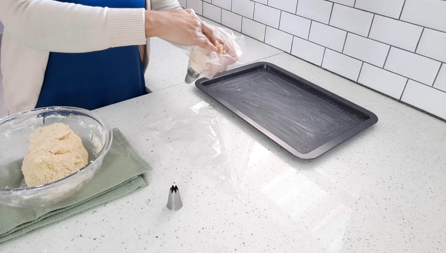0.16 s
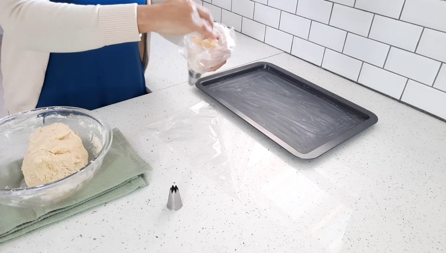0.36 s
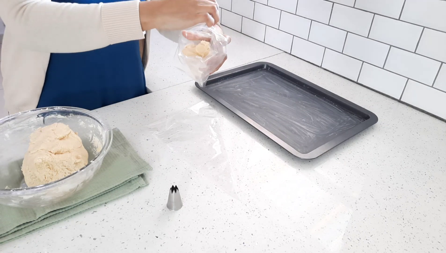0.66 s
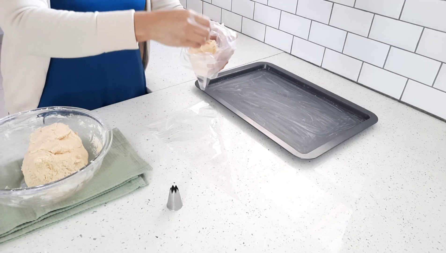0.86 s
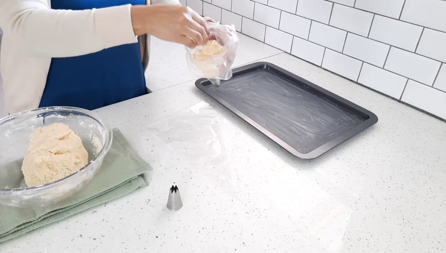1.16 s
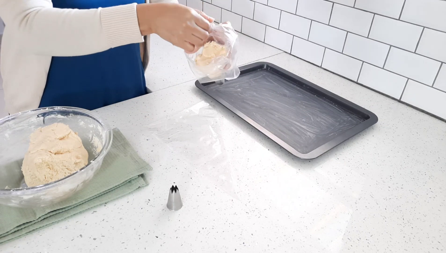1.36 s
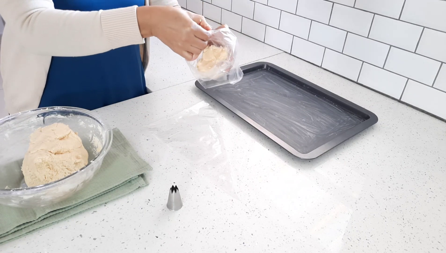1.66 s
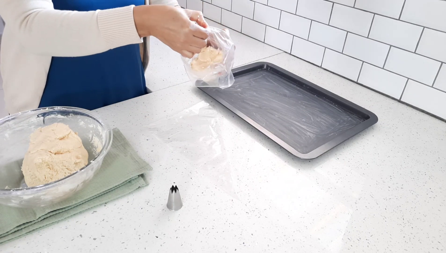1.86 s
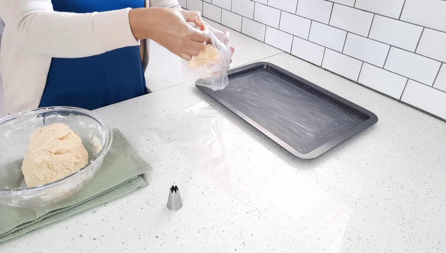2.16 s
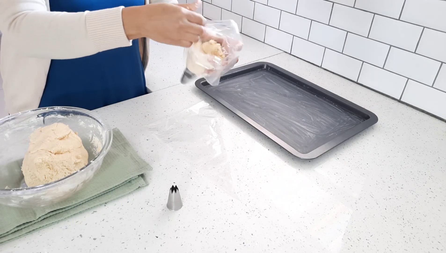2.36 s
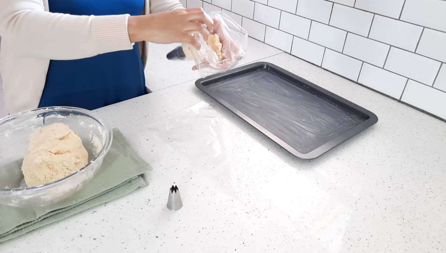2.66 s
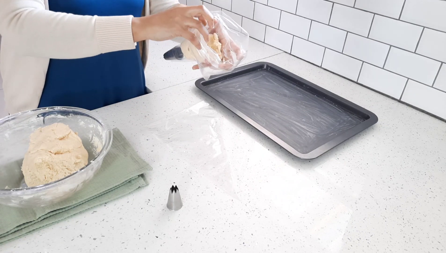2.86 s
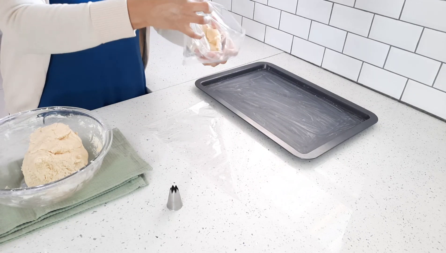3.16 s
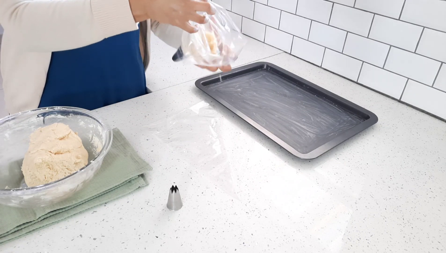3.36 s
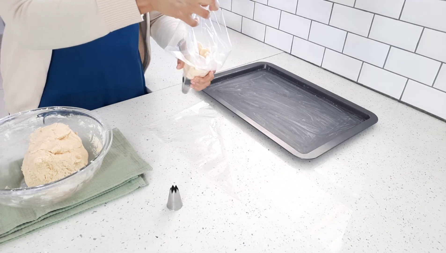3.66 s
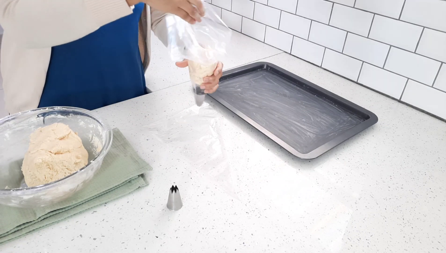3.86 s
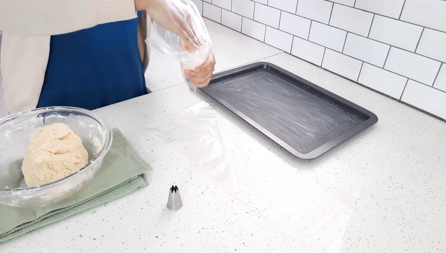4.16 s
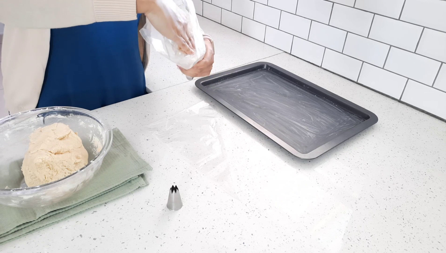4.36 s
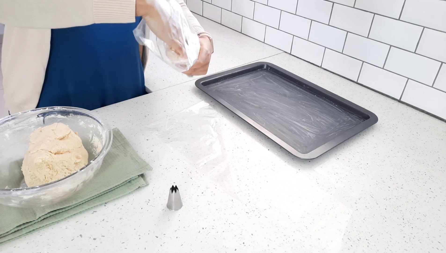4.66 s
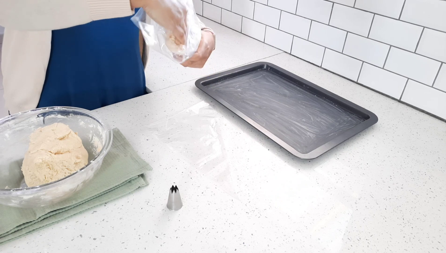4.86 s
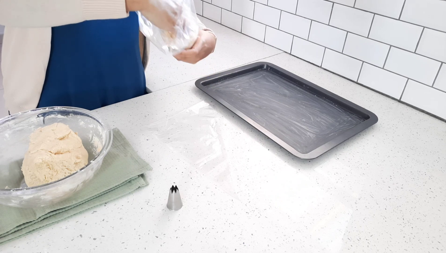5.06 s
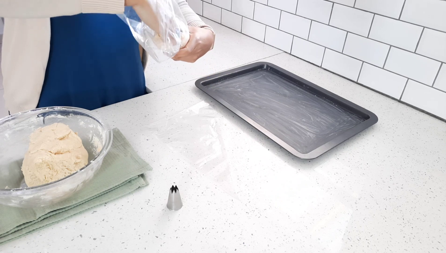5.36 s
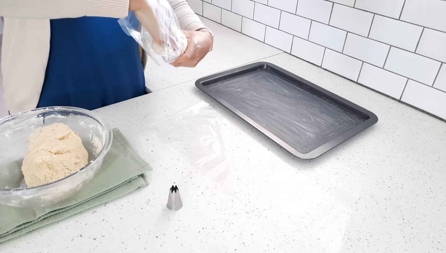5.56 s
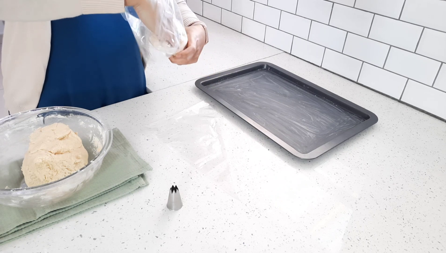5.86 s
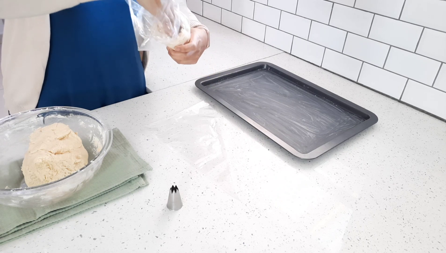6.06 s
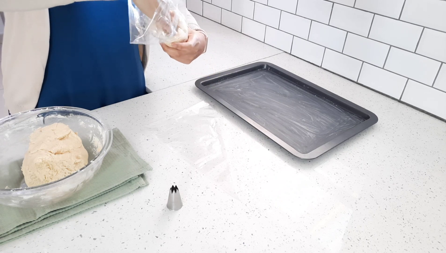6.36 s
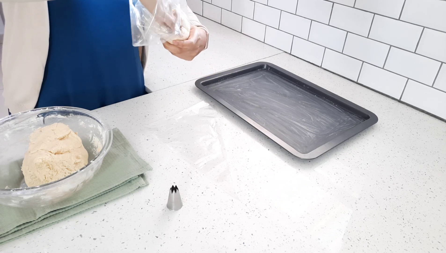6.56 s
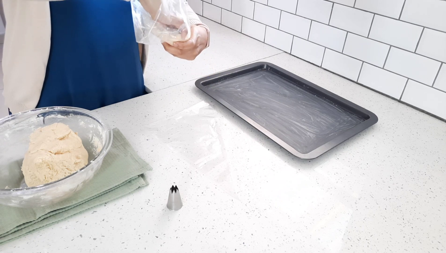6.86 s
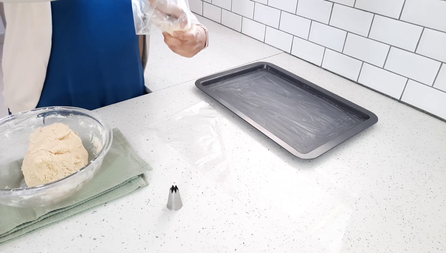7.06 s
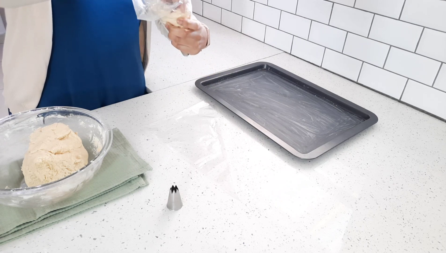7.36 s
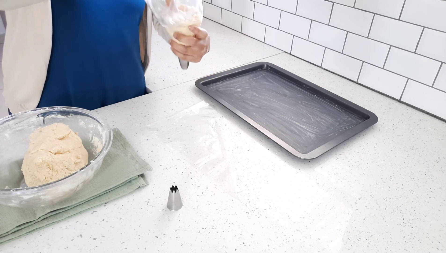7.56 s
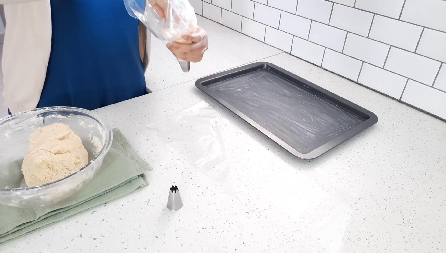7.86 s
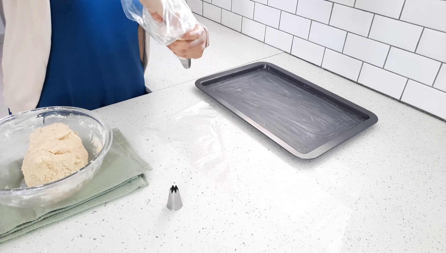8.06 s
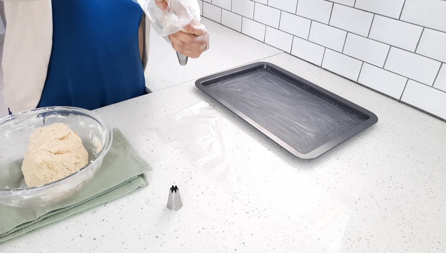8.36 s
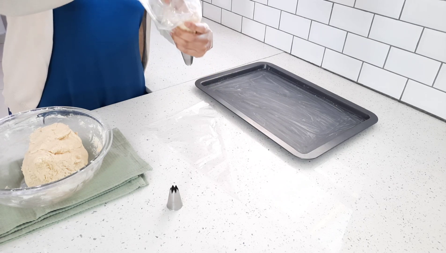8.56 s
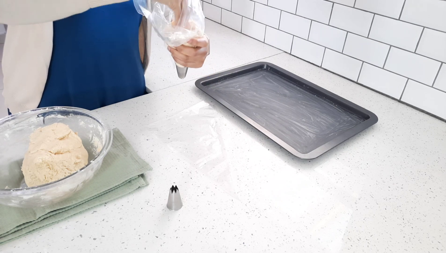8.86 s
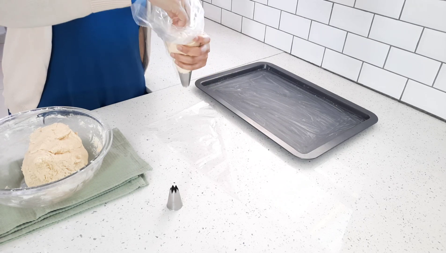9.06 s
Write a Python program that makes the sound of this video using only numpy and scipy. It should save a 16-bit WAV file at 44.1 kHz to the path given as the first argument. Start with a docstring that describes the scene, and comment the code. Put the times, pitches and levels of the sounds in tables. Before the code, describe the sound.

Plastic film is handled near two microphones, slightly stronger on the left. It begins sparse and quiet, with a small nozzle tick and a short sliding hiss, then swells into sharp crinkling and flapping with muffled dough knocks. Separate twisting and squeezing bursts follow, with brief lulls between, each leaving a short bright room reflection above a faint appliance hum.

```python
"""A plastic piping bag full of soft dough, heard by a close pair of microphones over a faint room hum.
It is lifted and turned, its metal nozzle ticks once and a finger hisses along the taut film.
The loose top is gathered, the dough pushed down, the neck twisted shut, the dough squeezed to the nozzle.
Film snaps, creases and pops as random flutter through resonant facets and short decaying sines, while
slack panels flap and dough thumps dully; a tiled kitchen rings after each sound."""
import sys
import numpy as np
from scipy import signal
from scipy.fft import rfft, irfft
from scipy.io import wavfile
from scipy.ndimage import uniform_filter1d

SR = 44100
rng = np.random.default_rng(int(sys.argv[2]) if len(sys.argv) > 2 else 0)


def file_out(sig):
    """Save sig as 16-bit WAV at sys.argv[1]."""
    # one column per channel
    cols = np.atleast_2d(sig).T
    # limit, then scale
    lim = np.clip(cols, -1, 1)
    pcm = np.round(lim * 32767).astype(np.int16)
    wavfile.write(sys.argv[1], SR, pcm)


N = 406161  # length in samples

# Colour of the buckling film. Each row: frequency in Hz, relative level in dB.
FILM_COLOUR = [(180, -18.5), (540, -2.5), (820, 5.5), (1200, 6), (1700, 5.5), (2500, 4.5), (3500, 1),
               (5500, 0), (7900, 0), (8900, -6), (11000, -9.5), (11900, -30)]
# Small, taut creases sound higher than broad, soft folds.
# Each row: frequency in Hz, share of the brightness (dB of colour per dB of brightness).
BRIGHTNESS_TILT = [(900, -0.537), (1500, -0.494), (2600, -0.062), (4500, 0.429), (10000, 0.658)]


def amp(db):
    """Decibels to gain."""
    return 10 ** (np.asarray(db) / 20)


def unit(x):
    """Scales to rms 1."""
    return x / np.sqrt(np.mean(x ** 2) + 1e-20)


def read(points, hz):
    """Reads a table on a log-frequency axis."""
    f, value = np.transpose(points)
    return np.interp(np.log(hz + 1), np.log(f), value)


def add(mix, s, sound):
    """Lays a sound into the mix at time s in seconds."""
    part = mix[max(round(s * SR), 0):][:len(sound)]
    part += sound[:len(part)]


def pop(colour, decay_s, uneven_db, bright_db=0, size=1024):
    """One buckle, energy 1: a jolt and a brief flutter through a facet with its own random resonances."""
    t, hz = np.arange(size) / SR, np.fft.rfftfreq(size, 1 / SR)
    jolt = np.searchsorted(t, .0005)  # the fold strains for an instant before it lets go
    envelope = np.minimum(t / t[jolt], np.exp((t[jolt] - t) / decay_s))
    flutter = rng.standard_normal(size) * envelope
    flutter[jolt] += 3.6
    flutter = rfft(flutter)

    knots = np.geomspace(100, 14000, 28)  # Hz, where the random resonances are drawn
    facet_db = read(colour, hz) + bright_db * read(BRIGHTNESS_TILT, hz)
    facet_db += uneven_db * np.interp(hz, knots, rng.standard_normal(len(knots)))

    spread = np.sqrt(uniform_filter1d(abs(flutter) ** 2, size=15))  # the flutter feeds all bands evenly
    cepstrum = irfft(np.log(amp(facet_db) / spread))
    cepstrum[1:size // 2] *= 2  # minimum phase: nothing rings before the fold moves
    cepstrum[size // 2 + 1:] = 0
    wave = irfft(np.exp(rfft(cepstrum)) * flutter)
    return wave / np.linalg.norm(wave)


def ring(hz, cycles, size=4096):
    """A stretch of film swings, falling to 1/e in the given cycles, energy 1."""
    turns = hz * np.arange(size) / SR
    wave = np.sin(2 * np.pi * turns) * np.exp(-turns / cycles)
    wave *= 1 - np.exp(-turns / 0.395)  # soft onset
    return wave / np.linalg.norm(wave)


def swarm(per_s, spread_db):
    """A train of random clicks, many small and few large, with its local power evened out."""
    chance, size = rng.random(N), rng.exponential(1, N)
    clicks = (chance < per_s / SR) * amp(spread_db * np.minimum(size, 3.6))
    power = uniform_filter1d(clicks ** 2, size=1801)
    return clicks / np.sqrt(abs(power) + 0.377 * np.mean(clicks ** 2))


def scatter(clicks, facets, choice):
    """Each click rings the facet that choice names at its moment."""
    at = np.flatnonzero(clicks)
    chosen = np.clip(choice[at], 0, len(facets) - 1)
    waves = np.array(facets)[chosen] * clicks[at, None]
    places = at[:, None] + np.arange(waves.shape[1])
    return np.bincount(places.ravel(), waves.ravel(), N)[:N]


def handling():
    """Every grip swells as it tightens and dies away on release: creasing dB, brightness dB, flapping dB."""
    # Each time the fingers take hold of the bag and press.
    # Each row: start in seconds, tightening in seconds, release to -20 dB in seconds,
    # relative creasing level in dB, brightness (treble over body) in dB, relative flapping level in dB.
    grips = [(0.309, 0.239, 0.1772, -50.5, -4, -66), (1.29, 0.135, 0.22, -68.5, 12, -74),
             (1.68, 0.029, 0.31, -58, 1.5, -64), (1.80, 0.1233, 0.76, -55, 8.5, -82),
             (1.93, 0.234, 0.2241, -42, -3.5, -48.5), (2.341, 0.0247, 0.24, -49.5, -12.5, -52),
             (2.52, 0.0634, 0.2144, -48, -6, -62), (2.671, 0.0211, 0.1, -46.5, -2.5, -50),
             (2.738, 0.0416, 0.0636, -42.5, 1, -69), (2.90, 0.0367, 0.26, -53.5, 8, -69.5),
             (3.05, 0.1312, 0.2242, -40.5, 3, -65), (3.17, 0.0243, 0.1, -40.5, 3, -45.5),
             (3.24, 0.048, 0.153, -32.5, 0, -41.5), (3.449, 0.0637, 0.0834, -44, -2.5, -51),
             (3.58, 0.038, 0.15, -48.5, -7.5, -49.5), (3.739, 0.0496, 0.1479, -34, -2.5, -40.5),
             (3.86, 0.0923, 0.2154, -40.5, -3, -50), (4.08, 0.0372, 0.6726, -45.5, -3, -56),
             (4.22, 0.1566, 0.2665, -41.5, -5, -51.5), (4.518, 0.0325, 0.107, -38.5, -3.5, -48),
             (4.60, 0.0533, 0.5319, -38.5, -5, -50), (5.031, 0.0261, 0.336, -49.5, -6, -58),
             (5.158, 0.078, 0.3458, -48.5, -4.5, -61.5), (5.37, 0.251, 0.2934, -42, -6.5, -57.5),
             (5.95, 0.0205, 0.5, -58, 1, -68), (6.049, 0.0455, 0.27, -47.5, -3, -56.5),
             (6.29, 0.1275, 0.36, -43, -4.5, -54), (6.60, 0.0976, 0.2253, -43, -7, -53),
             (6.83, 0.047, 0.1961, -40.5, -7, -56.5), (6.91, 0.0549, .11, -44, -12, -72.5),
             (7.19, 0.0265, 0.16, -51.5, 2.5, -67), (7.27, 0.0234, 0.16, -48, -10.5, -59.5),
             (7.474, 0.0551, 0.0062, -49, -3, -63.5), (7.548, 0.03154, 0.1537, -39.5, 3, -54),
             (7.60, 0.0258, 0.1832, -45.5, -8.5, -55), (7.77, 0.0637, 0.36, -47, -6.5, -54),
             (7.919, 0.0475, 0.5614, -44.5, -6, -54), (8.049, 0.181, 0.0532, -37.5, 0, -54),
             (8.35, 0.0365, 0.1415, -45.5, -13.5, -60.5), (8.699, 0.0554, 0.1626, -38.5, -2, -46.5),
             (8.951, 0.0835, 0.11, -49, 3, -59), (9.14, 0.0146, 0.52, -55, -3.5, -69)]
    held_db, held_flap_db = -80.5, -75.5  # relative creasing and flapping while the bag is only held
    tighten_power = 1.3  # the sound grows as this power of the time since the fingers took hold

    creasing = np.full(N, amp(held_db) ** 2)
    flaps = np.full(N, amp(held_flap_db) ** 2)
    colour = np.zeros(N)
    t = np.arange(2 * SR) / SR
    for start, tighten_s, release_s, db, bright_db, flap_db in grips:
        swell = (t / tighten_s) ** tighten_power
        release = amp(-20 * np.maximum(t - tighten_s, 0) / release_s)
        effort = np.minimum(swell, release)
        power = (amp(db) * effort) ** 2
        add(creasing, start, power)
        add(colour, start, bright_db * power)  # the loudest grip rules the brightness
        add(flaps, start, (amp(flap_db) * effort) ** 2)
    return 10 * np.log10(creasing), colour / creasing, 10 * np.log10(flaps)


def snaps():
    """Large folds flip over, each with its own colour; broad, dull ones take longer to settle."""
    # The loudest folds to buckle.
    # Each row: time in seconds, relative level in dB, brightness (treble over body) in dB.
    folds = [(0.41, -52, -10), (0.485, -45, 2.5), (0.4909, -40.5, -7.5), (0.5181, -36.5, -2),
             (0.6784, -53, 0), (0.7565, -52, -11), (0.8655, -60, -8), (1.423, -46, 11.5),
             (1.548, -47.5, 14.5), (1.7016, -43.5, 5), (1.775, -47, 1), (1.9512, -40, -2), (1.9596, -36, 5),
             (1.9899, -33.5, 12), (2.0265, -32, 11), (2.095, -33, 27), (2.1098, -31.5, -1),
             (2.1541, -31, 7), (2.2515, -39, 3), (2.426, -40, 9.5), (2.5505, -46.5, 5.5),
             (2.5677, -39.5, 2), (2.599, -36, 7), (2.7035, -33, 3.5), (2.7613, -36.5, 3), (2.926, -39, 10),
             (3.0502, -37.5, 11.5), (3.111, -36, 7.5), (3.1845, -29.5, 5), (3.194, -30, 3.5),
             (3.207, -28, 3), (3.226, -31, 1.5), (3.262, -28.5, 6), (3.2777, -29.5, -4),
             (3.304, -26.5, -0.5), (3.3463, -30.5, 2.5), (3.4535, -31.5, 4.5), (3.476, -36, 9),
             (3.5079, -32.5, 1), (3.606, -38, -10.5), (3.7011, -41, -0.5), (3.743, -29.5, 6.5),
             (3.773, -27.5, -8), (3.786, -27, -1), (3.7973, -22.5, -3), (3.9756, -32, 50),
             (4.1404, -28.5, 8.5), (4.2629, -34.5, -1.5), (4.4089, -26.5, 3), (4.4333, -28, 4.5),
             (4.527, -36.5, 1), (4.5408, -30.5, 7), (4.5825, -32.5, 8.5), (4.6413, -31.5, 8.5),
             (4.6613, -27.5, 5), (4.747, -28, -6.5), (4.852, -26.5, 1.5), (4.9468, -33.5, 4),
             (4.979, -35, 8), (5.192, -35.5, 8.5), (5.403, -36, 4), (5.5414, -31.5, 10),
             (5.5801, -36.5, -1), (5.645, -29.5, 9), (5.7598, -37.5, -8.5), (5.8325, -38, -2.5),
             (6.0793, -35, 3.5), (6.311, -36.5, -6), (6.3951, -36.5, -1), (6.456, -33, 13.5),
             (6.51, -35.5, 16.5), (6.6265, -38.5, 2.5), (6.6605, -33, 0.5), (6.7656, -33.5, -1.5),
             (6.8638, -28.5, 5), (6.976, -31.5, 7), (7.0136, -36, -1), (7.1998, -45.5, 6.5),
             (7.278, -38, 3.5), (7.433, -52.5, -3), (7.4809, -44.5, -9.5), (7.761, -36, -4),
             (7.9354, -29, -10), (8.067, -27.5, 2.5), (8.1597, -33.5, -3), (8.2445, -27.5, 1.5),
             (8.349, -35.5, 3.5), (8.72, -31.5, -3.5), (8.743, -31.5, 43)]
    out = np.zeros(N)
    for s, db, bright_db in folds:
        decay_s = 0.000773 * amp(-.3 * bright_db)
        add(out, s, amp(db) * pop(FILM_COLOUR, decay_s, uneven_db=2.5, bright_db=bright_db))
    return amp(23.5) * out


def crinkle(level_db, bright_db, count=100):
    """Tiny creases give way, more of them the harder the film is worked."""
    per_s = 300 * amp(.3 * (level_db + 43.5))
    clicks = amp(level_db) * swarm(per_s, spread_db=6.5)
    kinds_db = np.linspace(-30, 20, count)  # facets from dull to bright
    facets = [pop(FILM_COLOUR, decay_s=0.000812, uneven_db=5.0, bright_db=db) for db in kinds_db]
    varied_db = bright_db + 4.0 * rng.standard_normal(N)
    return amp(1.28) * scatter(clicks, facets, np.searchsorted(kinds_db, varied_db))


def pleats():
    """A broad pleat turns inside out: a small crack and a short hollow ring."""
    # Broad pleats that flip over with a hollow, pitched pop.
    # Each row: time in seconds, relative level in dB, pitch in Hz.
    flips = [(1.5485, -49, 3200), (1.776, -47.5, 1396), (2.775, -39, 1500), (2.802, -41, 1062),
             (3.0843, -48.5, 1080), (3.2276, -35.5, 920), (3.304, -31, 926), (3.454, -33.5, 974),
             (3.531, -39.5, 767), (3.7866, -28, 1905), (4.3265, -38, 1250), (4.568, -29, 2000),
             (4.6773, -31.5, 1050), (4.8136, -33.5, 1210), (5.6188, -35, 877), (6.1161, -43, 1106),
             (6.1534, -39.5, 1065), (6.4547, -31.5, 1067), (6.6262, -37, 1233), (6.7072, -36.5, 1270),
             (6.7319, -40, 1000), (6.8829, -36, 1226), (6.9755, -30.5, 1160), (7.304, -41, 1017),
             (7.5534, -34.5, 1555), (7.562, -29, 1080), (7.768, -38, 1600), (7.9687, -33.5, 1230),
             (8.1284, -36.5, 856), (8.171, -30, 1100), (8.451, -42.5, 1776), (8.7, -45, 867.3),
             (8.752, -27, 866), (8.771, -31, 1023), (8.8876, -41.5, 814)]
    crack_db = -4.5  # the crack of the edge against the ring
    out = np.zeros(N)
    for s, db, hz in flips:
        add(out, s, amp(db) * ring(hz, cycles=1.48))
        crack = pop(FILM_COLOUR, decay_s=0.00155, uneven_db=3.0, bright_db=-2)
        add(out, s, amp(db + crack_db) * crack)
    return amp(19.5) * out


def rubbing(level_db, bright_db):
    """Film slides on film with a fine hiss, strongest where the creasing is loud and bright."""
    hz = np.fft.rfftfreq(N, 1 / SR)
    colour_db = read(FILM_COLOUR, hz) + 9 * read(BRIGHTNESS_TILT, hz)
    hiss = unit(irfft(rfft(rng.standard_normal(N)) * amp(colour_db), N))
    return hiss * amp(level_db + 0.84 * bright_db - 11.5)


def slide():
    """A finger drags over taut film: swelling friction noise through the film's resonances."""
    # One drag of the finger: start in seconds, swell in seconds, release to -20 dB in seconds,
    # relative level in dB.
    drag = (1.29, 0.145, 0.09, -60)
    # Resonances of the taut film. Each row: frequency in Hz, width in Hz, relative level in dB.
    resonances = [(2120, 255, -3.5), (3140, 270, -1.5), (4200, 470, -1), (7950, 810, -1.5)]
    start, swell_s, release_s, db = drag
    t, out = np.arange(SR) / SR, np.zeros(N)
    friction = rng.standard_normal(SR)
    hiss = np.zeros(SR)
    for hz, width_hz, peak_db in resonances:
        hiss += amp(peak_db) * signal.lfilter(*signal.iirpeak(hz, hz / width_hz, fs=SR), friction)
    envelope = np.minimum((t / swell_s) ** 2, amp(-20 * (t - swell_s) / release_s))
    add(out, start, amp(db) * unit(hiss) * envelope)
    return out


def flapping(level_db, snapped, count=24):
    """Slack panels flex under the fingers, and each snap shakes them too."""
    # Colour of whole panels flexing. Each row: frequency in Hz, relative level in dB.
    panel_colour = [(50, -35), (105, -18), (155, -7), (215, -6.5), (300, 3.5), (430, 3), (620, -6),
                    (1000, -14), (2000, -38)]
    panels = [pop(panel_colour, decay_s=0.003, uneven_db=2.5) for _ in range(count)]
    clicks = amp(level_db) * swarm(per_s=330, spread_db=4.5)
    flexing = scatter(clicks, panels, rng.integers(0, count, N))
    panel_band = signal.butter(2, [200, 550], "band", fs=SR, output="sos")
    shaken = signal.sosfilt(panel_band, snapped)
    return flexing + shaken


def thumps():
    """The dough knocks a panel, and the whole bag sways below it in pitch."""
    # The dough thumps against the slack bag.
    # Each row: time in seconds, relative level in dB, pitch in Hz.
    knocks = [(2.045, -44.5, 294.6), (2.178, -39.5, 290.3), (2.449, -45.5, 298.5), (3.185, -34, 452),
              (3.275, -33, 321.3), (3.529, -39.5, 379.7), (3.795, -27.5, 288.2), (4.116, -45.5, 309),
              (4.25, -44.5, 287.6), (4.67, -40, 325), (4.797, -42, 311), (6.659, -43, 292),
              (7.609, -44, 307), (8.241, -41.5, 369.6), (8.766, -39, 292.3)]
    cycles = 2.51  # for the swing to fall to 1/e
    sag_ratio, sag_db = 0.6806, -13.5  # pitch ratio and relative level of the bag's slower sway
    out = np.zeros(N)
    for s, db, hz in knocks:
        sway = amp(sag_db) * ring(hz * sag_ratio, cycles)
        add(out, s, amp(db) * (ring(hz, cycles) + sway))
    return amp(19.5) * out


def nozzle():
    """A light tick rings the small metal cone as a sum of decaying sine modes."""
    # The single tick: time in seconds, relative level in dB.
    tick = (0.9412, -38)
    # Modes of the cone. Each row: frequency in Hz, relative level in dB, t60 in seconds.
    modes = [(1244, -6, 0.026), (2394, 1.5, 0.015), (2540, 2.5, 0.013), (5690, 0, 0.0126), (5960, 1, 0.015),
             (8400, 3.5, 0.0217)]
    t, out = np.arange(SR // 10) / SR, np.zeros(N)
    ringing = sum(amp(db - 60 * t / t60) * np.sin(2 * np.pi * hz * t) for hz, db, t60 in modes)
    s, db = tick
    add(out, s, amp(db) * ringing / 2)
    add(out, s, amp(db + 18.5) * pop(FILM_COLOUR, decay_s=0.0056, uneven_db=1.0, bright_db=9.0))
    return out


def kitchen(x):
    """The bag is nearer the left microphone; the hard room resonates and rings after it."""
    # Standing waves between counter, cupboards and tiles. Each row: frequency in Hz, relative level in dB.
    room_modes = [(157, 1.5), (204, 2), (242, -6.5), (288, -3), (340, -1.5), (415, -4), (1065, -4),
                  (1267, -6), (1384, -8.5)]
    near = np.array([x, np.zeros(N)])
    add(near[1], 4 / SR, amp(-8.5) * x)  # later and weaker on the right
    standing = sum(amp(db) * signal.lfilter(*signal.iirpeak(hz, hz / 18, fs=SR), x)
                   for hz, db in room_modes)
    return amp(-0.5) * near + amp(1.66) * reverberation(x) + amp(1.0) * standing


def reverberation(x, count=5):
    """As the bag turns, its sound crossfades round a cycle of different paths through the room."""
    out = np.zeros((2, N))
    turn = np.arange(N) / SR * 22  # 22 paths a second
    for k in range(count):
        away = (turn - k + count / 2) % count - count / 2
        facing = np.cos(np.pi / 2 * np.minimum(abs(away), 1))
        out += signal.oaconvolve((facing * x)[None], room_response(), axes=1)[:, :N]
    return out


def room_response():
    """Dense reflections: hands, counter and tray answer at once, then each band dies at its own speed."""
    # Reverberation of the kitchen. Each row: frequency in Hz, t60 in seconds.
    decay_times = [(150, 0.283), (500, 0.38), (1200, 0.403), (3000, 0.503), (7000, 0.35), (11000, 0.332)]
    taps = rng.choice([-1, 1], (2, SR // 2)) * (rng.random((2, SR // 2)) < 9000 / SR)
    hz, t, z = signal.stft(taps, SR, nperseg=256)
    alike = np.sinc(hz / 1500)[:, None]  # long waves reach both microphones alike
    z[1] = alike * z[0] + np.sqrt(1 - alike ** 2) * z[1]
    decay = amp(-60 * t / read(decay_times, hz)[:, None])
    tail = signal.istft(z * decay, SR, nperseg=256)[1]
    t = np.arange(tail.shape[1]) / SR
    tail *= np.clip(t / 0.00019, 0, 1) * (1 + 2.26 * np.exp(-t / 0.00264))  # strong early reflections
    return tail / np.linalg.norm(tail, axis=1, keepdims=True)


def room_tone():
    """Soft ventilation noise with the wavering hum of an appliance, made of narrow noise bands."""
    # Colour of the room's still air. Each row: frequency in Hz, relative level in dB per Hz.
    air_colour = [(20, -24.5), (45, -25), (70, 2.5), (120, -2), (160, -2.5), (240, -13), (330, 5.5),
                  (430, -24), (540, -6), (800, -7.5), (1100, -25), (8000, -29.5), (12000, -40.5)]
    # The hum. Each row: frequency in Hz, relative level in dB.
    hum_bands = [(64, -79.5), (204, -82)]
    hz = np.fft.rfftfreq(N, 1 / SR)
    z = rfft(rng.standard_normal((2, N)))
    alike = np.clip(0.437 * np.sinc(hz / 1900), -1, 1)  # likeness of the two microphones
    z[1] = alike * z[0] + np.sqrt(1 - alike ** 2) * z[1]
    air = amp(-70) * unit(irfft(z * amp(read(air_colour, hz)), N))
    hum = np.zeros(N)
    for centre_hz, db in hum_bands:
        band = rfft(rng.standard_normal(N)) / (1 + ((hz - centre_hz) / 4) ** 2)
        hum += amp(db) * unit(irfft(band, N))
    return air + hum


def scene():
    """The bag in the kitchen."""
    level_db, bright_db, flap_db = handling()
    snapped = snaps()
    film = snapped + pleats() + crinkle(level_db, bright_db) + rubbing(level_db, bright_db) + slide()
    bag = film + flapping(flap_db, snapped) + thumps() + nozzle()
    return kitchen(bag) + room_tone()


def record(dry):
    """The left microphone is a little louder; then a steep low-pass limits the band."""
    low_pass = signal.firwin(255, 11950, window=("kaiser", 8), fs=SR)  # cutoff in Hz
    balance = amp([[1.0], [-1.0]])  # left, right in dB
    return signal.oaconvolve(dry * balance, low_pass[None], "same")


dry = scene()
out = record(dry)
file_out(out)
```